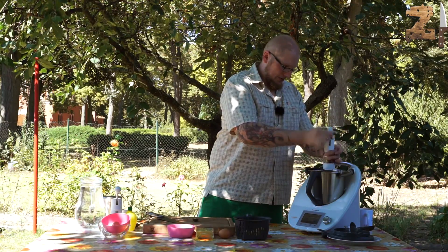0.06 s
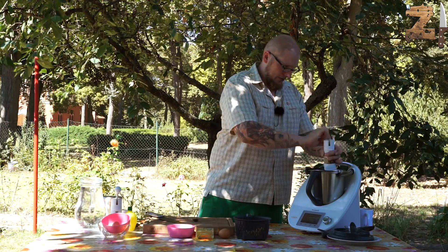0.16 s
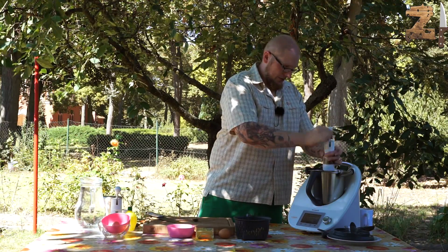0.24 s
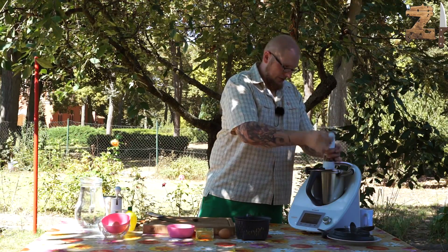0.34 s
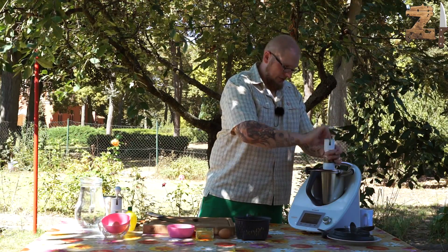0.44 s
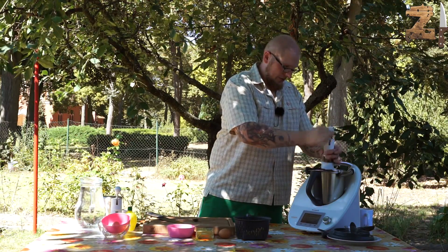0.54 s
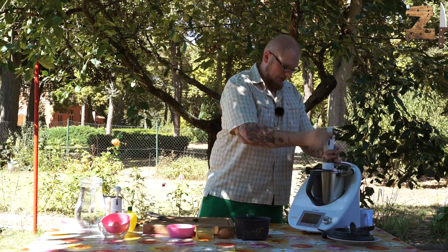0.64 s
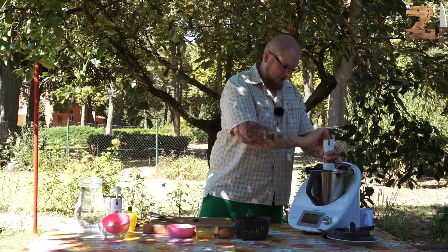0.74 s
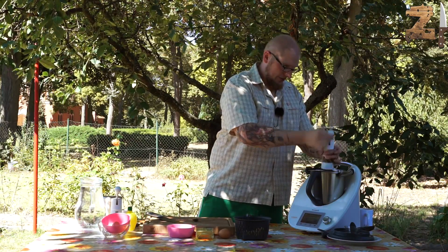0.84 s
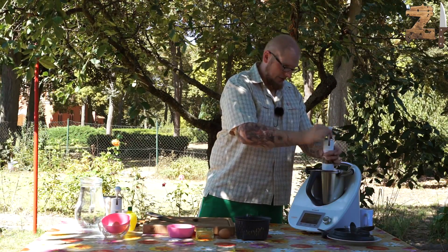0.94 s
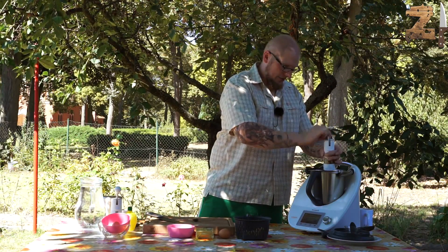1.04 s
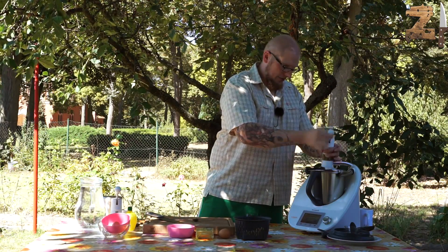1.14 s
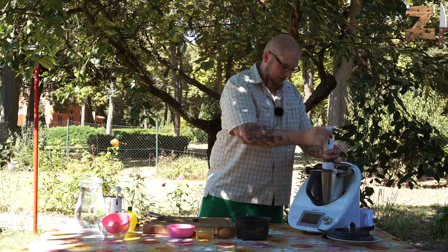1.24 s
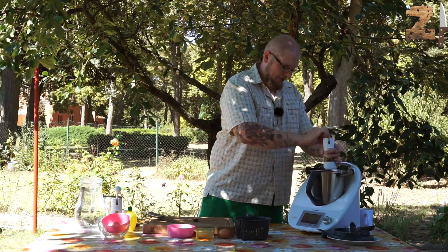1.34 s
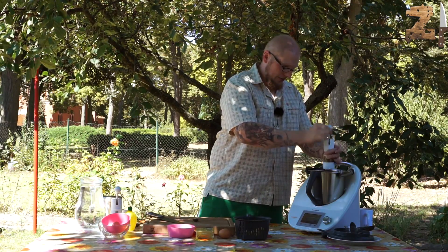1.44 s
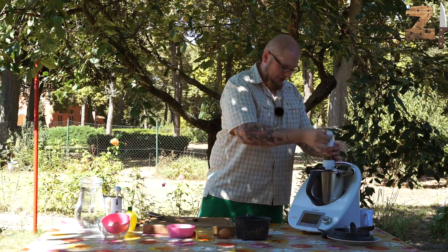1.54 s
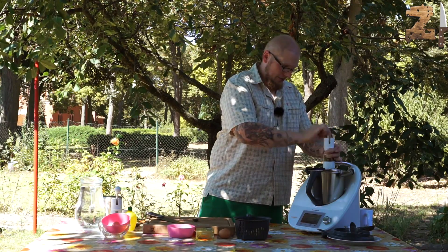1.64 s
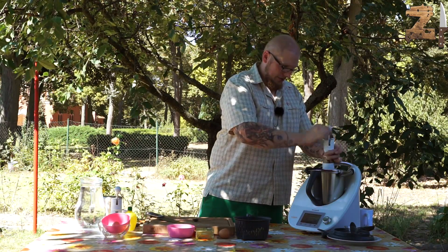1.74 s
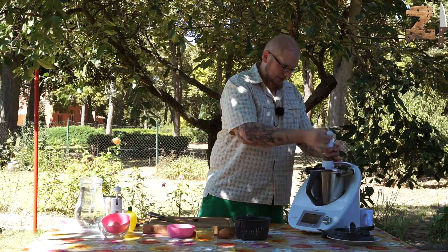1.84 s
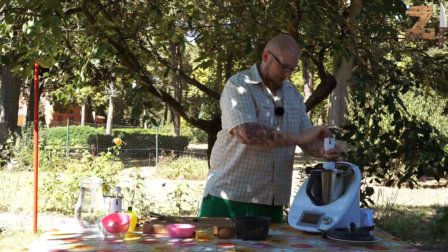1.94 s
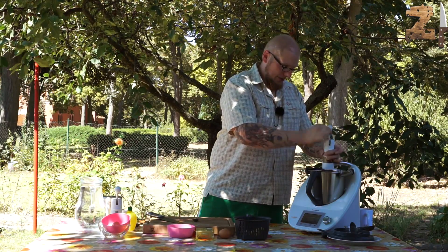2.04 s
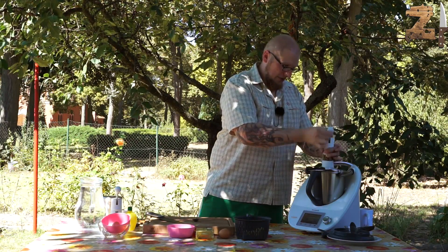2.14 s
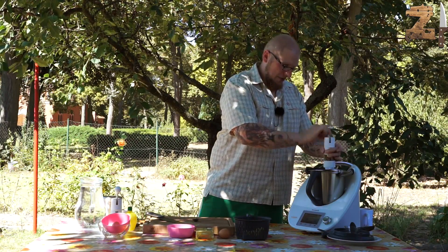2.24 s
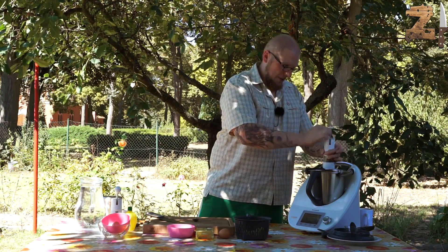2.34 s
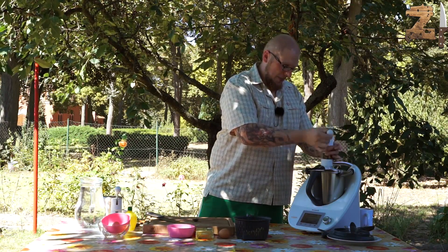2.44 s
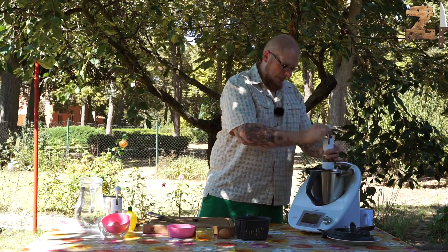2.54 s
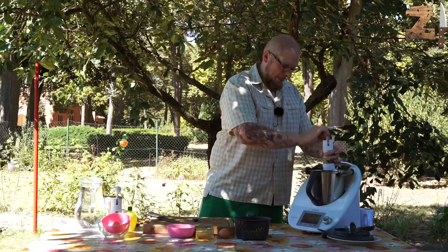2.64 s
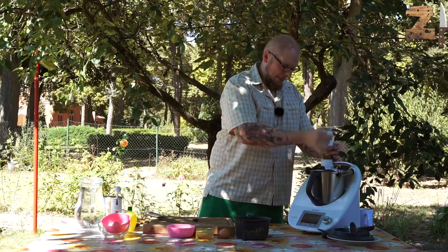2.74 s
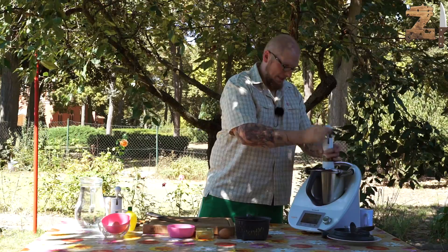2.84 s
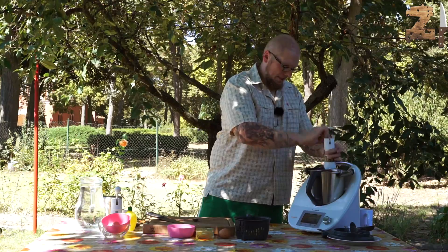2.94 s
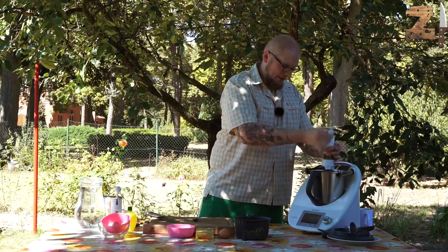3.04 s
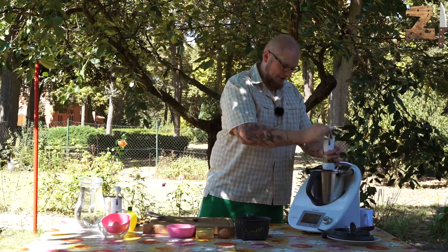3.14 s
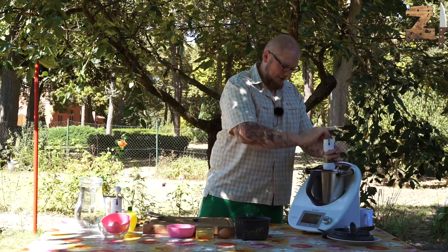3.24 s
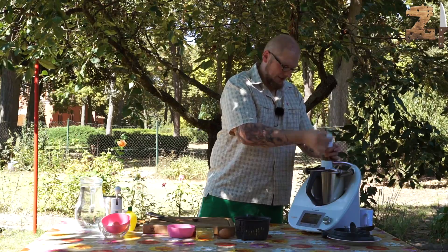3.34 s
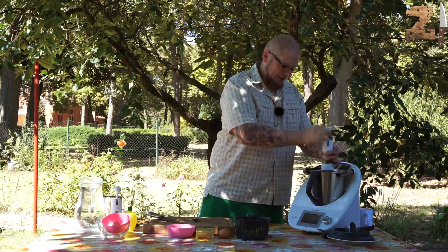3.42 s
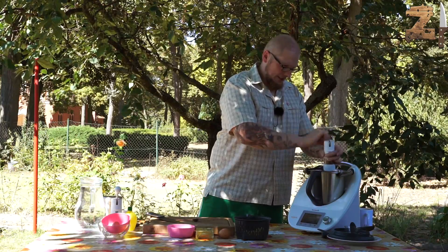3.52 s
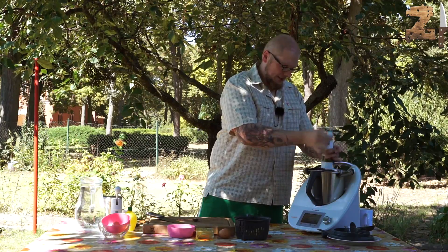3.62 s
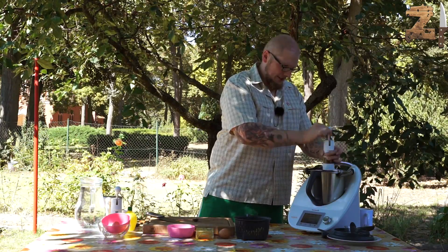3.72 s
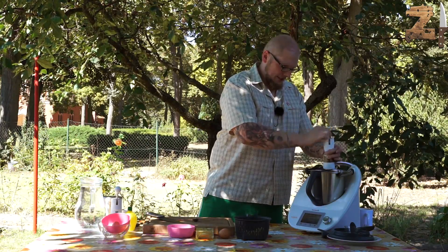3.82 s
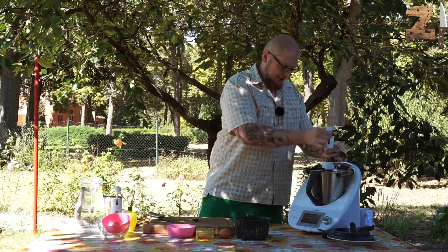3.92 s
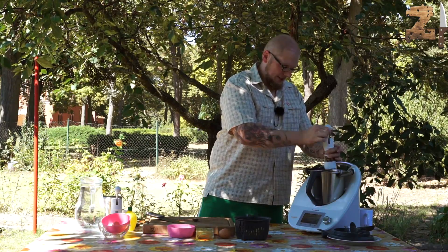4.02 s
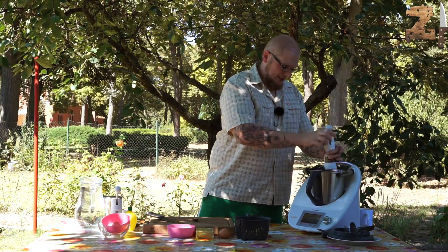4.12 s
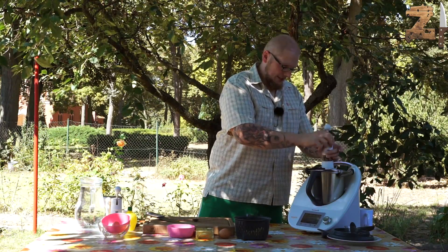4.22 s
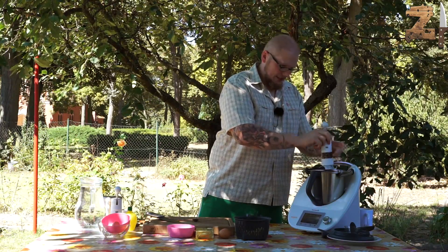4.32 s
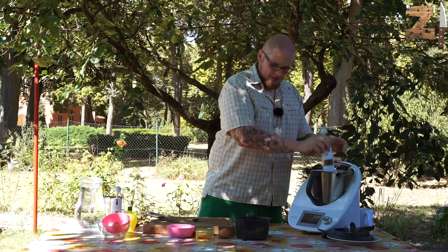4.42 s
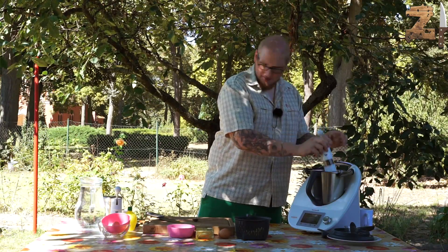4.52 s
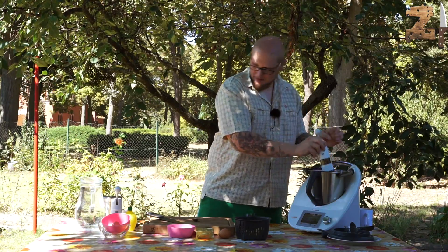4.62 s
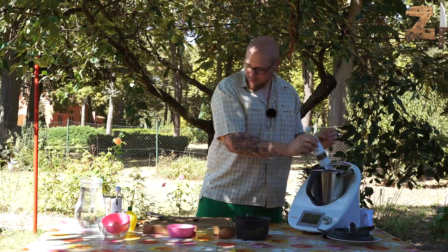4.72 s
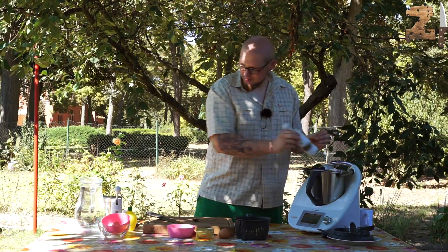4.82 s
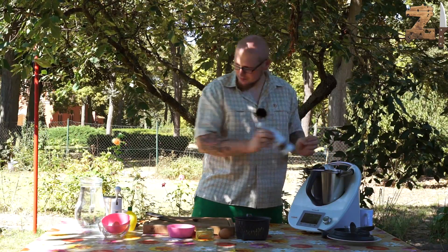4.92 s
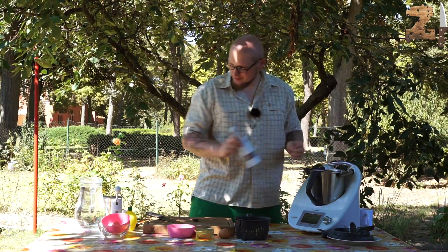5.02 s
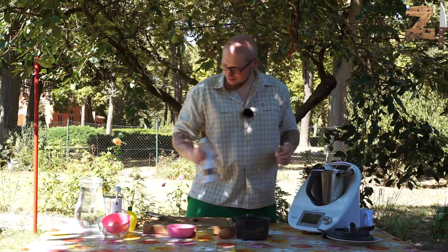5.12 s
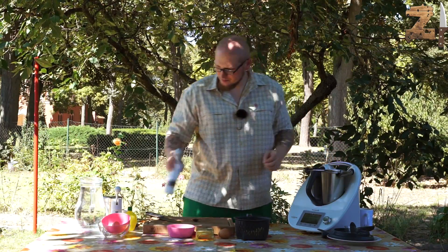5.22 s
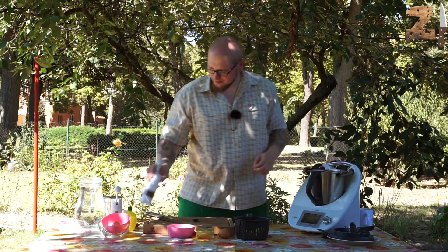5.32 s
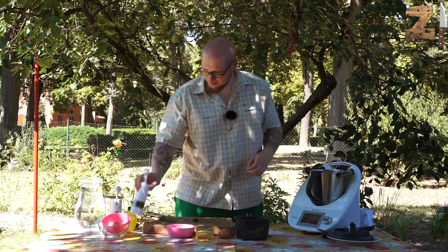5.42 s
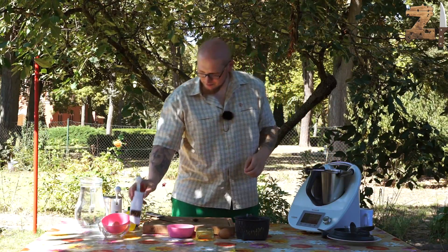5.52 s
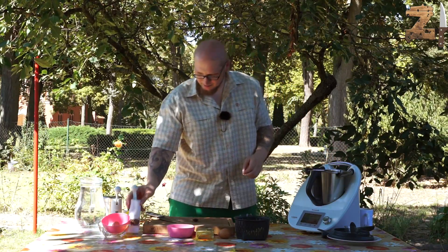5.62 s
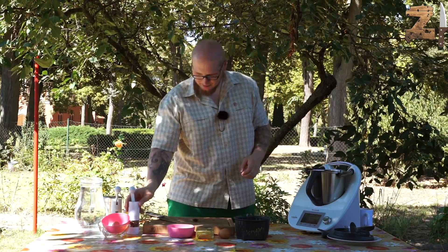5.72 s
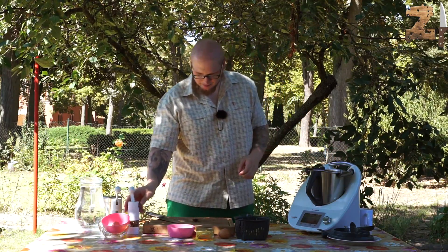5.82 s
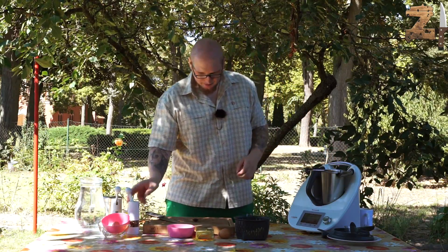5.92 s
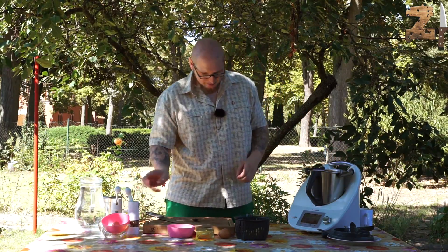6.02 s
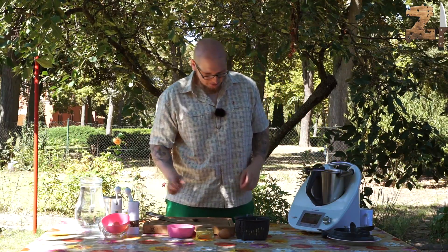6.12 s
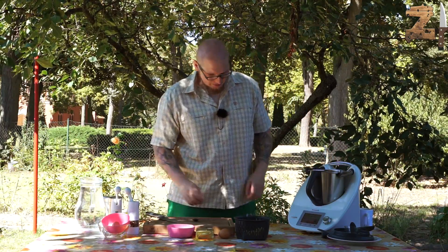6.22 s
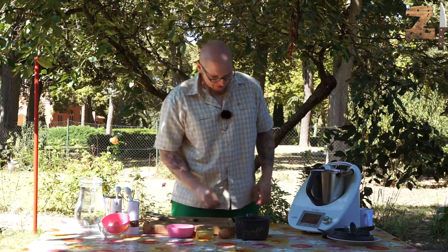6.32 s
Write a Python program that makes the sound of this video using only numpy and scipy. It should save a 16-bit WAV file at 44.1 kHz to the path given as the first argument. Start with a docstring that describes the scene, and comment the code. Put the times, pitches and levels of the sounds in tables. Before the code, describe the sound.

Close and dry, a hand pepper mill is twisted about seven times a second for four seconds, each twist a short run of crisp cracks with gritty crunch and a slight metallic ring from a steel bowl. Loose grains rustle as it is lifted, a sleeve swishes, then it knocks hard on a laid table with faint glass ringing. Behind is quiet garden air and a distant engine.

```python
"""A garden, with soft air, a low breeze and a far engine throughout: shaped noise and a wavering tone.
For the first four seconds a hand pepper mill is twisted back and forth over a steel mixing bowl; each
twist cracks a run of grains, made of short noise bursts that ring narrow resonances of mill and bowl.
The mill is then lifted away with a rustle of loose grains and a sleeve, while a thin whistle sounds far off.
Last it is set down hard on a laid table: a push, decaying modes and rattling noise, with faint glassware."""
import sys
import numpy as np
from scipy import signal
from scipy.fft import rfft, irfft, next_fast_len
from scipy.io import wavfile
from scipy.ndimage import map_coordinates

SR = 44100
rng = np.random.default_rng(int(sys.argv[2]) if len(sys.argv) > 2 else 0)


def materialize(psi):
    """Save the field psi as 16-bit PCM at rate SR to the path in sys.argv[1].

    A 1-D psi becomes a single channel; in a 2-D psi each row is a channel.
    """
    bounded = np.clip(np.atleast_2d(psi).T, -1, 1)
    quanta = np.round(bounded * 32767).astype(np.int16)
    wavfile.write(sys.argv[1], SR, quanta)


N = 280468  # length in samples


def amp(db):
    """Decibels to gain."""
    return 10 ** (np.asarray(db) / 20)


def unit(x):
    """Each row at rms 1."""
    return x / np.sqrt(np.mean(x ** 2, axis=-1, keepdims=True) + 1e-20)


def along(points, hz):
    """Read (Hz, value) points between their knots on a log frequency axis."""
    knot_hz, value = np.transpose(points)
    return np.interp(np.log(hz + 1), np.log(knot_hz + 1), value)


def curves(rows):
    """One value per sample for each column after the time."""
    s, *columns = np.transpose(rows)
    return [np.interp(np.arange(N) / SR, s, column) for column in columns]


def wobble(rate):
    """A smooth random curve with rate knots a second."""
    knots = rng.standard_normal(int(N * rate / SR) + 4)
    return map_coordinates(knots, [np.arange(N) * rate / SR])


def filtered(x, response):
    """x through a response given as a function of frequency."""
    size = next_fast_len(N + SR // 2)
    return irfft(rfft(x, size) * response(np.fft.rfftfreq(size, 1 / SR)), size)[:N]


def noise(spectrum):
    """Steady noise of the given colour at rms 1."""
    return unit(filtered(rng.standard_normal(N), lambda hz: amp(along(spectrum, hz))))


def tone(hz):
    """A sine of rms 1 that follows a frequency curve."""
    return np.sqrt(2) * np.sin(2 * np.pi * np.cumsum(hz) / SR)


def coloured(x, spectrum, tilt, size=4096):
    """Rows through causal, minimum-phase filters that keep attacks sharp; tilt in dB an octave for each row."""
    hz = np.fft.rfftfreq(size, 1 / SR)
    octaves = np.log2(np.maximum(hz, 1600) / 4000)
    db = along(spectrum, hz) + np.reshape(tilt, (-1, 1)).clip(-8, 8) * octaves
    # folding the cepstrum onto positive time gives minimum phase
    cepstrum = irfft(np.log(amp(np.maximum(db, -90))))
    cepstrum[:, 1:size // 2] *= 2
    cepstrum[:, size // 2 + 1:] = 0
    response = irfft(np.exp(rfft(cepstrum)))
    return signal.fftconvolve(x, response, axes=1)[:, :x.shape[1]]


def bursts(spectrum, t60, attack, count, edge=0, tilt=0, spread=0.31, size=2048):
    """Rows of a sharp break (edge) and noise dying over about t60 s, each with the energy of 5 ms at rms 1."""
    t = np.arange(size) / SR
    life = t60 * np.exp(spread * rng.standard_normal((count, 1)))
    envelope = amp(-60 * t / life) * (1 - np.exp(-t / attack))
    debris = unit(rng.standard_normal((count, size)) * envelope)
    rows = coloured(debris + edge * np.sqrt(size) * (t == 0), spectrum, tilt)
    return unit(rows) * np.sqrt(.005 * SR / size)


def placed(times, db, rows):
    """Each row starts at its time, at its level."""
    start = np.round(np.asarray(times) * SR).astype(int).clip(0)
    index = start[:, None] + np.arange(rows.shape[-1])
    return np.bincount(index.ravel(), (amp(db)[:, None] * rows).ravel(), N)[:N]


# The colour of the distant garden air. Each row: frequency in Hz, relative density in dB per Hz.
AIR_COLOUR = [(13, -56.5), (22, -27), (43, -17), (96, -13), (130, -10.5), (275, -11), (306, -13),
              (470, -13), (920, -15), (997, -12.5), (1850, -23), (2010, -19), (2290, -26), (5560, -33.5),
              (13500, -45)]


def distant_air(level_db=-60.5):
    """Distant air: coloured noise whose level wavers gently."""
    return amp(level_db + 0.42 * wobble(3.3)) * noise(AIR_COLOUR)


# The breeze rising and falling. Each row: time in seconds, low rumble level before the trim in dB.
BREEZE_LEVEL = [(0, -72), (.3, -65), (.6, -61), (1, -68.5), (1.8, -73.5), (2.1, -74.5), (4, -67.5),
                (5, -72), (6.36, -68.5)]
# The colour of its low rumble. Each row: frequency in Hz, relative density in dB per Hz.
BREEZE_COLOUR = [(20, -24), (40, -7), (58, 5), (80, -6.5), (140, -33.5), (400, -69), (1000, -120)]


def breeze(trim_db=-1):
    """A low breeze: rumbling noise that swells and sinks."""
    level_db, = curves(BREEZE_LEVEL)
    return amp(level_db + trim_db) * noise(BREEZE_COLOUR)


# A far engine pulls away. Each row: time in seconds, mean firing rate in Hz, mean level in dB.
ENGINE_PATH = [(0, 110, -89), (4.1, 112, -85), (4.4, 116, -73), (4.9, 129, -70), (5.2, 130, -75.5),
               (5.65, 136, -64.5), (6.1, 141, -71), (6.36, 140, -88)]


def far_engine():
    """The hum of a far engine: a sine at the firing rate, unsteady in pitch and level."""
    firing_hz, level_db = curves(ENGINE_PATH)
    unsteady_hz = firing_hz * (1 + 0.0096 * wobble(10.0))
    return amp(level_db + 1.6 * wobble(9.4)) * tone(unsteady_hz)


# A thin whistle far off in the garden. Each row: time in seconds, level in dB.
WHISTLE_LEVEL = [(5.1, -100), (5.2, -73), (5.4, -75), (5.55, -76), (5.7, -100)]


def whistle(hz=2030):
    """A faint far whistle: a sine that wavers quickly about its pitch."""
    level_db, = curves(WHISTLE_LEVEL)
    return amp(level_db) * tone(hz * (1 + .008 * wobble(60)))


# How long the garden scatters sound. Each row: frequency in Hz, t60 in seconds.
GARDEN_T60 = [(200, 0.36), (1500, 0.17), (5000, 0.28), (10000, 0.24), (13000, 0.19), (16000, 0.19)]


def echoes(x, delay_s=.008):
    """Table, ground and trees scatter a thin tail: noise that dies at its own rate in each band."""
    hz, t, bands = signal.stft(rng.standard_normal(SR // 2), SR, nperseg=256)
    decay = amp(-60 * t / along(GARDEN_T60, hz)[:, None])
    tail = signal.istft(bands * decay, SR, nperseg=256)[1]
    tail = np.pad(tail / np.linalg.norm(tail), (int(delay_s * SR), 0))
    return signal.fftconvolve(x, tail)[:N]


# The arm swings to the table. Each row: time in seconds, sleeve level in dB.
SLEEVE_LEVEL = [(4.1, -71), (4.4, -66.5), (4.8, -64.5), (5.03, -60.5), (5.18, -72), (5.45, -73), (5.7, -90)]
# The colour of the cloth. Each row: frequency in Hz, relative density in dB per Hz.
CLOTH_COLOUR = [(100, 0), (400, 6), (1100, 2), (2500, -2), (5000, -9.5), (9000, -11), (14000, -29.5),
                (16000, -29.5)]


def sleeve():
    """A sleeve swishes: cloth noise that follows the swing of the arm."""
    level_db, = curves([(SLEEVE_LEVEL[0][0] - .1, -120), *SLEEVE_LEVEL])
    return amp(level_db) * noise(CLOTH_COLOUR)


# The mill is tipped and lifted. Each row: time in seconds, rustle level before the trims in dB.
RUSTLE_LEVEL = [(4.45, -76), (4.456, -77), (4.548, -43), (4.584, -53), (4.594, -57), (4.69, -40),
                (4.766, -64), (4.772, -51), (4.86, -86)]
# The colour of grains rubbing in the mill. Each row: frequency in Hz, relative density in dB per Hz.
RUB_COLOUR = [(650, -38), (1100, -5), (1780, 0), (3260, -9.5), (3990, 1.5), (4460, -4), (6750, -3),
              (8540, -1), (10500, -4), (16000, -25)]
# Loose grains shift. Each row: start in seconds, level before the trim in dB, tilt in dB an octave.
LOOSE_GRAINS = [(4.3218, -45.5, -5.5), (4.4107, -44, -10), (4.4418, -42, -10), (4.5191, -40, -4),
                (4.5496, -32.5, 3), (4.5778, -36, 2), (4.621, -40, -7), (4.6368, -35, 2), (4.6525, -33, 3),
                (4.6847, -25.5, 8), (4.7205, -34, 8), (4.7478, -38.5, -2.5), (4.7747, -41, -1),
                (4.799, -41, 4), (5.226, -43.5, -7)]


def lifted_away(slide_db=-4, grains_db=-5, loose_db=-12.0, scatter_db=5, count=130):
    """Loose grains slide and tick as the mill is tipped and lifted: rough noise and short bursts."""
    first_s, last_s = RUSTLE_LEVEL[0][0], RUSTLE_LEVEL[-1][0]
    level_db, = curves([(first_s - .05, -120), *RUSTLE_LEVEL, (last_s + .05, -120)])
    slide = amp(level_db + slide_db) * unit(noise(RUB_COLOUR) * amp(3.27 * wobble(260)))
    when = rng.uniform(first_s, last_s, count)
    size_db = level_db[(when * SR).astype(int)] + grains_db + scatter_db * rng.uniform(-2.7, 1, count)
    tilts = 2 * rng.standard_normal(count)
    grain_rows = bursts(RUB_COLOUR, t60=0.012, attack=.0001, edge=0.41, tilt=tilts, count=count)
    grains = placed(when, size_db, grain_rows)
    s, db, tilt = np.transpose(LOOSE_GRAINS)
    tick_rows = bursts(RUB_COLOUR, t60=0.016, attack=0.00033, tilt=tilt, count=len(s))
    return slide + grains + placed(s, db + loose_db, tick_rows)


# The mill's shell. Each row: frequency in Hz, relative density in dB per Hz.
SHELL_COLOUR = [(120, -42), (200, -35.5), (335, -35.5), (468, -14.5), (585, -24.5), (877, -17), (1190, -5),
                (1330, 0), (1690, 1), (2460, -13), (2750, -6.5), (3340, -11), (4180, -4.5), (4740, -19.5),
                (5600, -19), (7280, -28), (12300, -120)]


def shell_bursts(**settings):
    """The mill's shell answers each blow with a short burst in its own colour."""
    return bursts(SHELL_COLOUR, **settings)


# The mill meets the table, then rocks as the fingers leave it.
# Each row: start in seconds, knock level (trimmed for each part) in dB, shell level in dB, snap level in dB.
TABLE_CONTACTS = [(5.7544, -9.5, -38, -35.5), (5.852, -58, -58, -63), (5.981, -64, -59, -48),
                  (5.9997, -62, -45.5, -56), (6.026, -68, -55, -57), (6.034, -72, -55, -68)]
# Modes of the table and the glassware on it. Each row: frequency in Hz, level before the trims in dB, t60 in s.
TABLE_MODES = [(99, -28, 0.22), (187.5, -12, 0.15), (247, -29, 0.17), (348, -11, 0.12), (470, -27, 0.098),
               (490, -30, 0.16), (547, -4, 0.065), (595, -23, .075), (663, -12, .07), (830, -33, .11),
               (930, -39, .15), (1044, -21, 0.11), (1180, -33, 0.093), (1370, -36, .1), (1556, -31, .1),
               (1720, -25, 0.098), (2014, -33, 0.19), (2380, -35, .12), (2780, -30, 0.11),
               (3321, -44, 0.41), (3400, -45, .35), (5470, -52, 1.0), (6449, -46, 0.82), (7585, -62.5, .34)]
# The table's rattle. Each row: frequency in Hz, relative density in dB per Hz.
RATTLE_COLOUR = [(30, -53), (70, -25), (130, -12), (200, -1), (350, -6.5), (620, -9.5), (1060, -6.5),
                 (1880, -21), (2820, -18), (4600, -29), (6500, -25.5), (10000, -38), (15000, -52)]
# The hard edge of the mill's base. Each row: frequency in Hz, relative density in dB per Hz.
EDGE_COLOUR = [(1000, -16), (3000, -4), (5500, -7), (8000, 0.5), (11000, -16.5), (16000, -34)]


def set_down(push_hz=650, push_s=0.00085, push_db=2.0, settle_s=.0101, settle_db=-8, ring_db=-1, rattle_db=-12):
    """The base gives a stiff push and settles flat, the shell clicks; the table rings and its load rattles."""
    s, knock_db, shell_db, snap_db = np.transpose(TABLE_CONTACTS)
    count = len(s)
    t = np.arange(SR * 3 // 5) / SR
    # the air hears the slope of the table top's quick swing
    turn = 2 * np.pi * push_hz
    swing = (t / push_s) * np.exp(1 - t / push_s) * np.cos(turn * t) * (1 - np.exp(-turn * t))
    push = amp(push_db) * np.gradient(swing) * SR / turn
    modes = sum(amp(db - 60 * t / t60) * np.sin(2 * np.pi * (hz * t + rng.random()))
                for hz, db, t60 in TABLE_MODES)
    ring = amp(ring_db) * modes * (1 - np.exp(-(t / 0.0021) ** 2))
    knock = placed(s, knock_db, push + ring)
    # the far edge of the base lands a moment later, softer and slower
    settle = placed(s + settle_s, knock_db + settle_db, np.interp(0.6 * t, t, push))
    rattle_rows = bursts(RATTLE_COLOUR, t60=0.18, attack=0.0015, spread=0, count=count, size=8192)
    rattle = placed(s, knock_db + rattle_db, rattle_rows)
    shell = placed(s, shell_db, shell_bursts(t60=0.024, attack=0.00055, spread=0.072, count=count))
    snap = placed(s, snap_db, bursts(EDGE_COLOUR, t60=0.0081, attack=0.00047, spread=.1, count=count))
    return knock + settle + rattle + shell + snap


CRACK_DB, SNAP_DB = -0.87, 1  # trims: every later tooth's body, and its snap over that
GRAIN_SCATTER_DB, SNAP_SCATTER_DB = 0.5, 1.35  # no two grains are alike
EASE_OFF_DB = -1.5  # the hand eases off on the last tooth
FIRST_TOOTH_DB, FIRST_SNAP_DB = -1, -0.5  # trims: the first tooth meets whole corns
BITE_FROM_S, BITE_TO_S = .003, .017  # just after the first tooth, the corns split in a quick cluster
BITE_DB, BITE_SNAP_DB, BITE_SCATTER_DB = -7, -12.5, 4  # each dull split: trim, snap over body, scatter
TAKE_UP_S, TAKE_UP_DB = .006, -16  # the corns shift before the first tooth: longest lead, level under it


def twist(start, length, teeth, slow_start, slow_finish, crack_db, snap_db, first_db, first_snap_db, bite_db,
          count=3):
    """One twist: a dull bite, then bright cracks paced by the wrist. Rows (s, body dB, snap over body dB)."""
    u = np.linspace(0, 1, int(round(teeth)))
    s = start + length * (u + u * (1 - u) * (slow_start * (1 - u) - slow_finish * u))
    body = np.full(len(u), crack_db + CRACK_DB)
    snap = np.full(len(u), snap_db + SNAP_DB)
    body[0] = first_db + FIRST_TOOTH_DB
    snap[0] = first_snap_db + FIRST_SNAP_DB
    body[-1] += EASE_OFF_DB
    # a big grain thumps more but snaps no louder
    grain, sharpness = rng.standard_normal((len(u), 2)).T
    heft = GRAIN_SCATTER_DB * grain
    cracks = np.column_stack([s, body + heft, snap - heft + SNAP_SCATTER_DB * sharpness])
    # whole corns shift, then split
    take_up = [start - TAKE_UP_S * rng.uniform(.5, 1), first_db + TAKE_UP_DB, BITE_SNAP_DB]
    share = (np.arange(count) + rng.random(count)) / count
    when = start + BITE_FROM_S + (BITE_TO_S - BITE_FROM_S) * share
    split_db = bite_db + BITE_DB + BITE_SCATTER_DB * rng.standard_normal(count)
    splits = np.column_stack([when, split_db, np.full(count, BITE_SNAP_DB)])
    return np.vstack([take_up, splits, cracks])


# Twists of the knob: the burr passes a few teeth, and each tooth cracks a grain. Levels are before the trims.
# Each row: first tooth in seconds, length in seconds, number of teeth, start lag and finish lag (shares of the
# whole twist length, below 0 is quicker), crack body in dB, crack snap over body in dB, first tooth body in dB,
# first tooth snap over body in dB, bite in dB.
KNOB_TWISTS = [(0.006, 0.082, 6, -0.05, 0.2, -26.5, -2.5, -29.0, -6.5, -26.0),
               (0.158, 0.087, 6, 0.09, 0.29, -28.5, -1.0, -28.0, -9.0, -20.5),
               (0.306, 0.105, 7, 0.1, 0.55, -27.5, -2.0, -29.0, -10.0, -26.5),
               (0.448, 0.097, 7, 0.44, 0.32, -27.5, -2.0, -31.5, -13.5, -34.5),
               (0.604, 0.093, 7, -0.08, 0.85, -28.0, -1.5, -25.0, -13.5, -23.0),
               (0.734, 0.087, 7, -0.17, 0.37, -27.5, -2.0, -35.0, -15.0, -38.5),
               (0.877, 0.082, 6, 0.1, 0.55, -29.5, 0.5, -29.0, -9.0, -28.0),
               (1.009, 0.081, 5, 0.32, 0.54, -27.5, -2.0, -26.0, -17.0, -34.5),
               (1.168, 0.08, 5, 0.4, 0.16, -27.0, -1.0, -29.5, -18.0, -35.5),
               (1.318, 0.113, 7, 0.21, 0.54, -29.5, -1.5, -35.0, -8.0, -36.5),
               (1.496, 0.101, 6, 0.71, 0.47, -27.0, -1.0, -34.0, -20.0, -35.0),
               (1.67, 0.096, 6, 0.1, 0.5, -26.0, -4.0, -26.5, -9.0, -29.0),
               (1.819, 0.083, 6, 0.48, 0.71, -26.5, -1.0, -29.5, -15.5, -33.0),
               (1.966, 0.089, 6, 0.18, 0.23, -27.0, -3.5, -24.5, -7.5, -26.0),
               (2.112, 0.074, 5, -0.04, -0.25, -25.5, -4.0, -29.5, -8.5, -25.0),
               (2.27, 0.097, 5, 0.26, 0.24, -28.5, -4.5, -24.5, -10.0, -29.0),
               (2.441, 0.085, 6, 0.42, 0.6, -24.5, -4.5, -30.0, -9.5, -39.0),
               (2.606, 0.076, 5, 0.45, 0.22, -27.5, -1.0, -23.5, -9.5, -26.0),
               (2.764, 0.101, 6, 0.67, 0.68, -26.0, -1.0, -28.0, -12.0, -28.0),
               (2.932, 0.077, 6, 0.02, 0.64, -26.5, -3.0, -27.0, -2.0, -38.5),
               (3.066, 0.079, 6, 0.27, 0.27, -27.0, -1.5, -26.5, -13.5, -24.5),
               (3.216, 0.084, 6, 0.12, 0.5, -27.0, -2.5, -25.5, -14.0, -24.5),
               (3.357, 0.1, 7, 0.16, 0.66, -26.5, -2.0, -25.5, -11.0, -26.0),
               (3.493, 0.092, 7, 0.29, 0.46, -27.5, -1.5, -25.5, -14.0, -40.0),
               (3.65, 0.077, 6, 0.01, 0.6, -25.0, -3.5, -27.0, -10.5, -27.0),
               (3.781, 0.096, 6, -0.1, 0.51, -28.5, -2.0, -33.0, -9.0, -30.0),
               (3.917, 0.072, 5, 0.47, 0.96, -26.5, -1.5, -31.0, -15.0, -36.0)]
# Now and then a hard corn bursts with a deeper crack.
# Each row: start in seconds, body before the mill's trim in dB, treble snap over body in dB.
HARD_CORN_BURSTS = [(0.1682, -25.5, -14), (1.3952, -23.5, -10.5), (1.7425, -25.5, -10),
                    (1.9791, -27.5, -12), (2.4884, -29, -12), (3.4297, -30.5, -25)]
# A lone click as the knob turns back or is let go.
# Each row: start in seconds, body before the mill's trim in dB, treble snap over body in dB.
TURNBACK_CLICKS = [(0.1397, -49, -1), (0.296, -43.5, -4), (0.718, -41, -10), (2.409, -38.5, -19),
                   (2.8966, -33.5, -14), (3.162, -37, -24), (4.054, -29.5, -10), (4.059, -36, -20)]


def cracking():
    """All twists, the hard corns and the clicks between twists, in order of time."""
    rows = np.vstack([twist(*row) for row in KNOB_TWISTS] + [HARD_CORN_BURSTS, TURNBACK_CLICKS])
    return rows[np.argsort(rows[:, 0])]


# Narrow resonances of mill and bowl. Each row: frequency in Hz, width in Hz, gain before the trim in dB.
BOWL_RESONANCES = [(450, 62, -16.5), (1385, 39, -2), (1390, 83, -17), (1767, 100, -1.5), (2003, 170, 0),
                   (2796, 89, -4), (3675, 260, 0.5), (4360, 140, 2.5), (7320, 340, -18), (10500, 520, -21)]


def bowl_ring(crunch, trim_db=-7):
    """The crunch rings mill and bowl through parallel band-pass resonances."""
    def response(f):
        return sum(amp(gain_db) * 1j * f * width / (centre ** 2 - f * f + 1j * f * width)
                   for centre, width, gain_db in BOWL_RESONANCES)
    return amp(trim_db) * filtered(crunch, response)


# Powder ground in the burr. Each row: frequency in Hz, relative density in dB per Hz.
GRIT_COLOUR = [(150, -32.5), (450, -7), (900, -7.5), (1500, 1.5), (2000, -8), (2500, -10), (4100, -16.5),
               (5500, -16), (10500, -29.5), (16000, -30)]


def grit(s, packed_db, shell, level_db=-13, drag_s=0.027, grain_db=4):
    """Powder grinds for as long as the burr is packed: rough noise follows the smoothed crack energy."""
    t = np.arange(-SR // 10, SR // 10) / SR
    window = np.exp(-(2 * t / drag_s) ** 2)
    energy = placed(s, packed_db, shell) ** 2
    effort = np.sqrt(np.abs(signal.fftconvolve(energy, window / window.sum(), "same")))
    return amp(level_db) * effort * unit(noise(GRIT_COLOUR) * amp(grain_db * wobble(450)))


# The burr's snap. Each row: frequency in Hz, relative density in dB per Hz.
SNAP_COLOUR = [(2820, -37.5), (4800, -7.5), (5930, -9), (6750, -0.5), (8520, -3.5), (10400, 2.5),
               (11600, -7), (15000, -11.5), (15800, -19.5), (16500, -15.5)]
# The burr's jump. Each row: frequency in Hz, relative density in dB per Hz.
JOLT_COLOUR = [(100, -41), (280, -16), (470, -2.5), (900, 2), (2000, -4), (6000, -79.5)]
# Small crumbs breaking. Each row: frequency in Hz, relative density in dB per Hz.
CRUMB_COLOUR = [(200, -35.5), (900, -11.5), (1600, 5), (2400, -8.5), (4100, -7.5), (5500, -9.5),
                (10000, -22.5), (16000, -38)]


def mill(body_db=-.5, snap_db=0, jolt_db=-18, crumb_db=-11.5, crumb_s=.007, scatter_db=7.0,
         body_tilt=2.4, snap_tilt=2.35, brightening=0.76, packed_s=0.024):
    """Grains crack one by one in noise bursts; while the burr is packed, their crumbs are crushed finer."""
    s, db, bright_db = cracking().T
    count = len(s)
    # each grain breaks in its own colour; a clean, bright break reaches highest
    shade, sparkle = rng.standard_normal((count, 2)).T
    reach = brightening * (bright_db - np.percentile(bright_db, 70)) + snap_tilt * sparkle
    shell = shell_bursts(t60=0.015, attack=0.00061, edge=0.3, tilt=body_tilt * shade, spread=0.29, count=count)
    body = placed(s, db + body_db, shell)
    snap_rows = bursts(SNAP_COLOUR, t60=0.011, attack=0.00015, edge=0.43, tilt=reach, spread=0.37, count=count)
    snap = placed(s, db + bright_db + snap_db, snap_rows)
    # the burr jumps forward as a grain gives way
    jolt = placed(s, db + jolt_db, bursts(JOLT_COLOUR, t60=0.0028, attack=.0002, edge=1.03, count=count))
    # cracks in close succession mean a packed burr; a lone crack stays clean
    gaps = np.minimum(np.diff(s, prepend=0), np.diff(s, append=np.inf))
    packed_db = db - 20 * np.log10(1 + (gaps / packed_s) ** 2).clip(None, .5)
    # smaller crumbs, two to a crack, break at random around it
    parent = np.repeat(np.arange(count), 2)
    when, strength = rng.laplace(size=(len(parent), 2)).T
    size_db = packed_db[parent] + crumb_db + scatter_db * (np.tanh(strength) - np.abs(when) / 2)
    crumb_rows = bursts(CRUMB_COLOUR, t60=0.01, attack=0.00014, count=len(parent))
    crumbs = placed(s[parent] + crumb_s * when, size_db, crumb_rows)
    crunch = body + snap + jolt + crumbs + grit(s, packed_db, shell)
    return crunch + bowl_ring(crunch)


def scene():
    """The mill, the handling and the knock in the open air, with the garden behind them."""
    background = distant_air() + breeze() + far_engine() + whistle()
    knock = set_down()
    grinding = mill() + lifted_away() + sleeve()
    tail = echoes(amp(-20) * grinding + amp(-19.5) * knock)
    return background + tail + knock + grinding


TOP_HZ = 16100  # the recorder's band limit


def record(dry):
    """The recorder cuts steeply above its band limit."""
    return filtered(dry, lambda hz: 1 / (1 + (hz / TOP_HZ) ** 120))


dry = scene()
out = record(dry)
materialize(out)
```